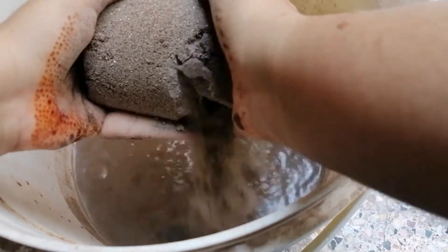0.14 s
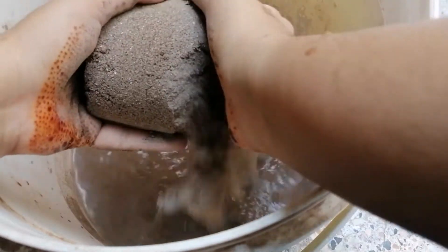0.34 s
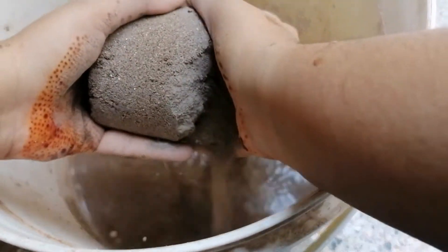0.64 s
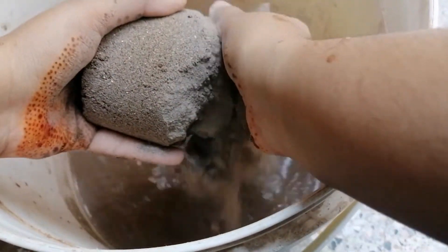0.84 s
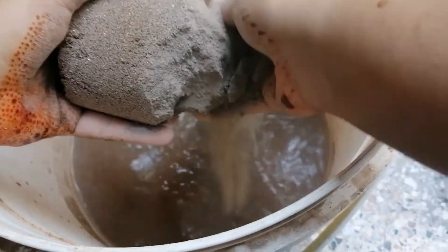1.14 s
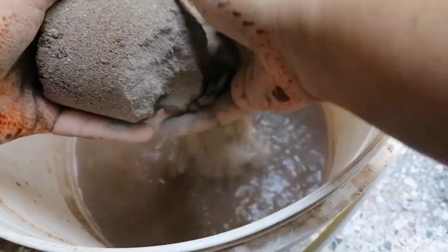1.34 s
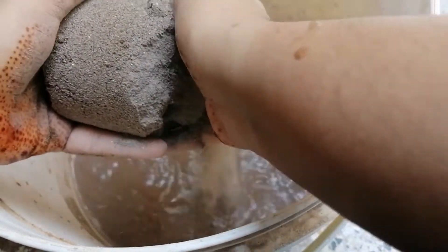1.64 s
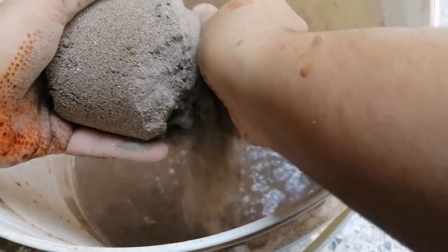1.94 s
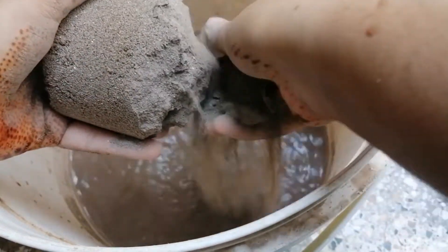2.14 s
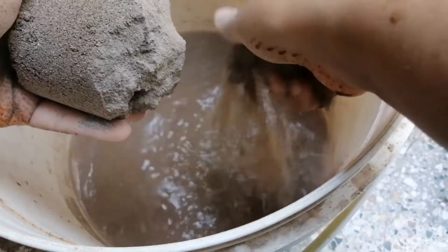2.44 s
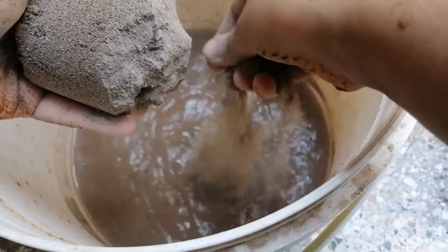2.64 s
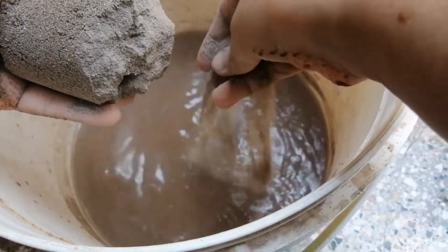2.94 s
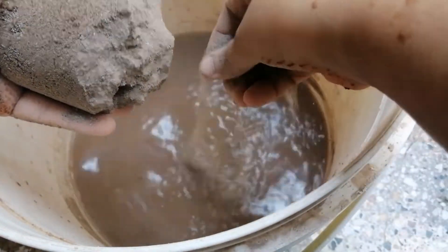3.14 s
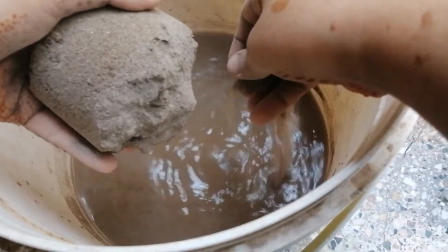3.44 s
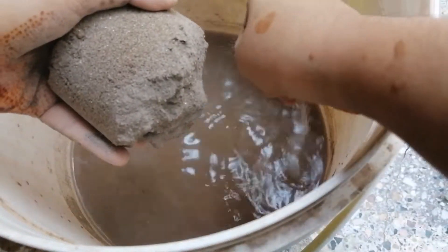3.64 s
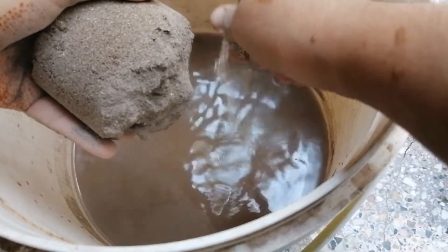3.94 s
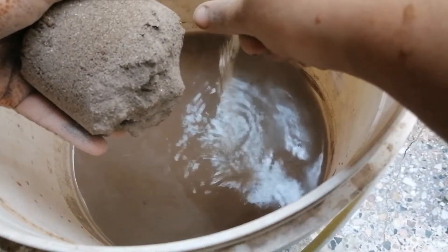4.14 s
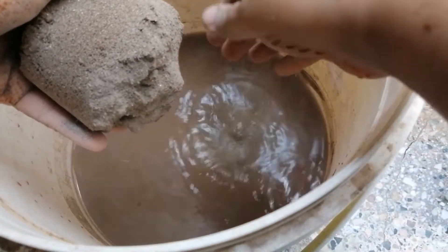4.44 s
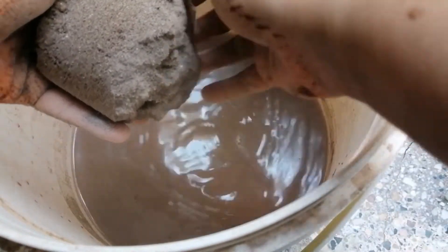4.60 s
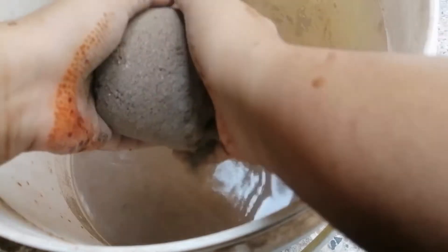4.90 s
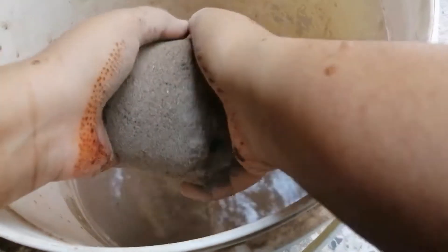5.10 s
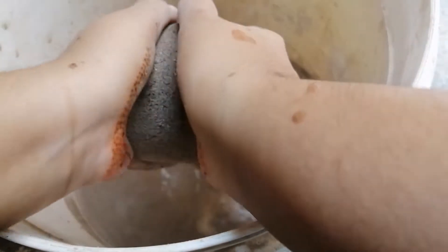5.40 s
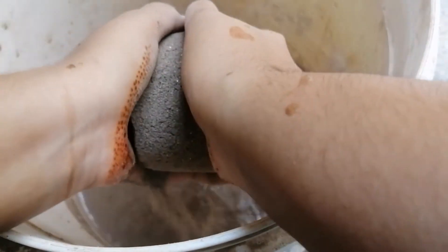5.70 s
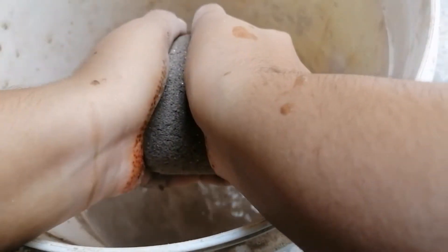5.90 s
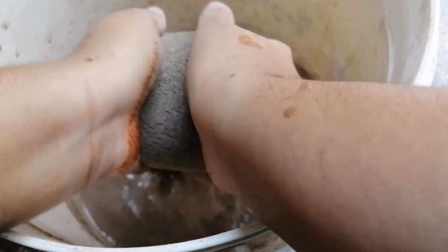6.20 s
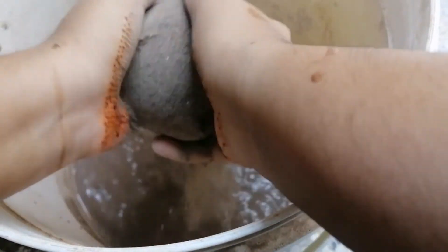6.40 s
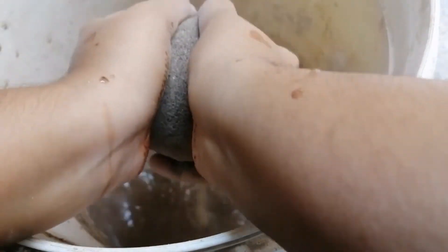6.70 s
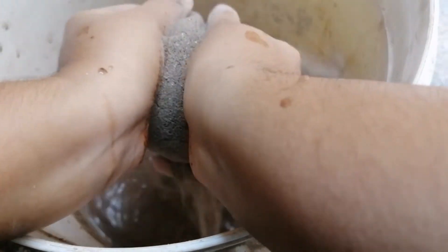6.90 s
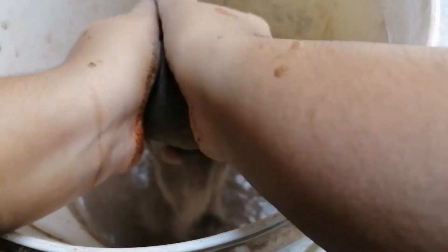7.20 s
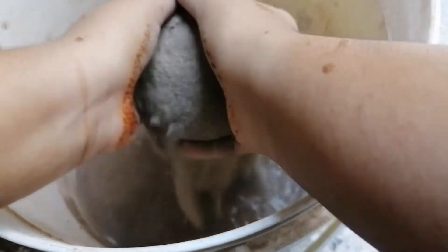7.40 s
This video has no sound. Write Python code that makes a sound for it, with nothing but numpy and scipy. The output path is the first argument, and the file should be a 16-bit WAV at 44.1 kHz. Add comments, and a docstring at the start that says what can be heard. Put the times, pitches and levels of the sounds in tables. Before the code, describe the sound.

Hands crumble wet sand over a plastic bucket of water, close by, with a faint, low machine hum throughout. From the start, grains rasp between the palms and patter onto the water. Crumbs make crisp, high ticks, and clods drop in with small plops and bubbles that ring briefly in the bucket, strongest around 0.3, 1 and 1.6 seconds. The ticks continue until about 2.7 seconds, then the sand thins to a faint trickle. At 3 seconds something is dragged in the distance, with a stronger low, booming scrape near 3.8 seconds. A few stray ticks and tiny bubbles follow between 4 and 4.5 seconds. Soft crumbling picks up at about 5 seconds. From 6 seconds comes a last flurry of gritty squeezes, ticks and plops, sharpest around 7 seconds and lasting to about 7.5 seconds.

```python
"""A machine hums while two hands crumble wet sand over a plastic bucket of water. From the start, grains
rasp between the palms and patter down. Crumbs tick, then clods plop in, leaving bubbles that ring in the
bucket. At 3 seconds the hands ease off and something is dragged in the distance. The crumbling picks up
again at about 5 seconds, with a last flurry of ticks and plops from 6 seconds on."""
import sys
import numpy as np
from scipy import signal
from scipy.fft import rfft, irfft, next_fast_len
from scipy.io import wavfile
from scipy.ndimage import uniform_filter1d, map_coordinates

SR = 44100
rng = np.random.default_rng(int(sys.argv[2]) if len(sys.argv) > 2 else 0)


def transcribe(signal):
    """Save signal, clipped to [-1, 1], as a 16-bit WAV file at the path in sys.argv[1]."""
    frames = np.atleast_2d(signal).T
    limited = np.clip(frames, -1, 1)
    pcm = np.round(limited * 32767).astype(np.int16)
    wavfile.write(sys.argv[1], SR, pcm)


N = 332955


def amp(db):
    return 10 ** (np.asarray(db) / 20)


def unit(x):
    return x / np.sqrt(np.mean(x ** 2) + 1e-20)


def along(points, hz):
    """Read a smooth line through (Hz, value) points."""
    pitches, values = np.transpose(points)
    return np.interp(np.log(hz + 1), np.log(pitches + 1), values)


def shaped(spectrum):
    return lambda hz: amp(along(spectrum, hz))


def resonances(table):
    """A filter that rings at each (Hz, width in Hz, dB) row."""
    return lambda f: sum((-1) ** k * amp(db) * 1j * f * width / (hz * hz - f * f + 1j * f * width)
                         for k, (hz, width, db) in enumerate(table))


def filtered(x, response):
    size = next_fast_len(N + SR // 2)
    return irfft(rfft(x, size) * response(np.fft.rfftfreq(size, 1 / SR)), size)[..., :N]


def wobble(rate):
    """A smooth curve through `rate` random values a second."""
    return map_coordinates(rng.standard_normal(int(N * rate / SR) + 4), [np.arange(N) * rate / SR])


def panned(x, pan_db):
    """Make stereo: pan is how much louder the left side is."""
    return np.array([x * amp(pan_db / 2), x * amp(-pan_db / 2)])


def add(track, start, sound):
    part = track[:, round(start * SR):][:, :sound.shape[1]]
    part += sound[:, :part.shape[1]]


def patchy(x, depth_db):
    """Make random patches of pitch and time louder or softer."""
    spectrum = signal.stft(x, nperseg=256)[2]
    patches = uniform_filter1d(rng.standard_normal(spectrum.shape[1:]), size=9, axis=0)
    patches = unit(uniform_filter1d(patches, size=14, axis=1))
    return unit(signal.istft(spectrum * amp(depth_db * patches), nperseg=256)[1][:, :N])


def swells(rows, edge_db):
    """A loudness curve of overlapping swells, each edge_db down at its ends."""
    t = np.arange(0, N, 64) / SR
    power = sum(amp(2 * (db - edge_db * np.maximum((peak - t) / rise, (t - peak) / fall)))
                for peak, rise, fall, db in rows)
    return np.interp(np.arange(N) / SR, t, np.sqrt(power))


def bursts(table, rise_share, edge_db):
    """One curve of swells for each of a table's two levels."""
    return [swells([(peak, rise_share * length, (1 - rise_share) * length, levels[k])
                    for peak, length, *levels in table], edge_db) for k in (0, 1)]


# Each row: pitch in Hz, how alike left and right are (1 is identical).
LIKENESS = [(60, 0.59), (240, 0.88), (950, 0.093), (3770, 0.0083), (15000, 0.016)]

def rush(response, grain_db=0., grain_rate=400):
    """Stereo noise, more alike in the bass; grains are quick flickers of level."""
    def colour(hz):
        angle = np.arccos(along(LIKENESS, hz)) / 2
        return response(hz) * [np.cos(angle), np.sin(angle)]
    noise = rng.standard_normal((2, N)) * amp(grain_db * wobble(grain_rate))
    mid, side = filtered(noise, colour)
    return unit(np.array([mid + side, mid - side]))


# The steady air. Each row: pitch in Hz, relative strength in dB.
AIR_SPECTRUM = [(13, -52), (22, -10.5), (42, -3), (65, -12.5), (125, -9), (175, -15), (313, -20.5),
                (576, -27), (921, -30), (1650, -36), (2600, -32.5), (4220, -47), (6570, -42), (15100, -54),
                (16400, -80)]

def machine_and_air(hum_hz=88.6, whine_hz=895):
    """A machine's wavering hum and thin whine over the air of the place."""
    phase = 2 * np.pi * np.cumsum(hum_hz + 0.92 * wobble(3)) / SR
    hum = np.sqrt(2) * amp(-55 + 1.2 * wobble(4)) * np.sin(phase)
    air = amp(-57) * panned(0.88, 1.0)[:, None] * rush(shaped(AIR_SPECTRUM))
    whine = amp(-72) * rush(resonances([(whine_hz, 28, 0)]))
    return panned(hum, 3.3) + air + whine


# The steady flow of grains. Each row: time in seconds, level in dB.
TRICKLE = [(0, -61), (0.4, -51), (0.67, -62.5), (1.0, -51), (1.3, -62.5), (1.6, -59), (2.5, -60),
           (2.8, -64), (4.35, -63.5), (4.65, -71.5), (5.3, -60.5), (5.95, -68), (6.3, -55.5), (7.0, -57.5),
           (7.55, -60)]
# Squeezes that shed sand. Each row: peak time and length in seconds, rasp and patter levels in dB.
SQUEEZES = [(0.197, 0.032, -43.5, -48), (0.296, 0.15, -41, -49), (0.54, 0.056, -40, -45),
            (0.751, 0.12, -54.5, -51), (1.09, 0.22, -47.5, -53), (1.535, 0.3, -45, -49.5),
            (1.821, 0.23, -50.5, -66), (2.06, 0.087, -50.5, -49), (2.36, 0.26, -56, -73.5),
            (2.55, 0.1, -61, -82), (2.675, 0.07, -51, -55.5), (3.401, 0.052, -58, -57.5),
            (4.473, 0.088, -54.5, -54), (5.0, 0.55, -56, -63), (5.44, 0.3, -57.5, -61),
            (5.54, 0.2, -52.5, -61), (5.72, 0.21, -55, -60.5), (6.063, 0.14, -53, -60),
            (6.165, 0.036, -61, -45), (6.215, 0.15, -49, -58), (6.42, 0.072, -47, -61.5),
            (6.528, 0.04, -45.5, -68), (6.678, 0.18, -51.5, -61), (6.973, 0.21, -45, -53),
            (7.1, 0.06, -44, -50), (7.55, 0.17, -58, -48)]
# Grains rubbing. Each row: pitch in Hz, relative strength in dB.
RASP_SPECTRUM = [(2060, -10), (3500, -5.5), (3980, -13.5), (4860, -3), (6220, 1), (7310, 4.5), (9220, -8),
                 (15600, -13.5), (16400, -40)]
# Grains hitting water. Each row: pitch in Hz, relative strength in dB.
PATTER_SPECTRUM = [(530, -56), (900, -10), (1010, -12), (1700, -27), (2740, -4.5), (3830, -12.5),
                   (5000, -9.5), (6500, -20), (11000, -120)]

def sand():
    """Grains rub between the palms, sprinkle the water and make it fizz."""
    trickle = amp(np.interp(np.arange(N) / SR, *np.transpose(TRICKLE)))
    shed, sprinkle = bursts(SQUEEZES, rise_share=0.5, edge_db=16.5)
    flow = np.hypot(trickle, shed)
    landing = np.hypot(amp(-9.5) * trickle, sprinkle)
    grit = patchy(rush(shaped(RASP_SPECTRUM), grain_db=2.5, grain_rate=570), depth_db=2.5)
    rasp = flow * amp(1.2 * wobble(40)) * panned(1, 1.9 + 1.3 * wobble(1.4)) * grit
    patter = landing * patchy(rush(shaped(PATTER_SPECTRUM), grain_db=3, grain_rate=230), depth_db=2.5)
    droplets = fizz(landing, low_hz=1248, spread=1.0, cycles=14, range_db=29, count=500)
    pings = fizz(landing, low_hz=4600, spread=0.8, cycles=28, range_db=26, count=900)
    pings = filtered(pings, shaped(RASP_SPECTRUM))
    return rasp + patter + amp(-13.5) * landing * droplets + amp(-13) * flow * pings


def fizz(flow, low_hz, spread, cycles, range_db, count):
    """Tiny bubbles ring briefly and rise in pitch, crowding where the flow is strong."""
    when, pitch, size, side = rng.random((count, 4)).T[:, :, None]
    samples = np.arange(SR // 100)
    turns = low_hz * np.exp(spread * pitch) * samples / SR
    shape = amp(-60 * turns / cycles) * (1 - np.exp(-turns / 2))
    pings = shape * np.sin(2 * np.pi * turns * (1 + 0.025 * turns / cycles))
    pair = panned(amp(range_db * size ** 3) * pings, 16 * (side - .4))
    share_fallen = np.cumsum(flow ** 2) / np.sum(flow ** 2)
    places = (np.interp(when, share_fallen, np.arange(N)).astype(int) + samples).ravel()
    return unit(np.array([np.bincount(places, channel.ravel(), N)[:N] for channel in pair]))


# Falling crumbs. Each row: time in seconds, level in dB, pitch in Hz, pan in dB.
CRUMBS = [(0.1258, -44, 5400, 13), (0.2042, -26.5, 7300, 6), (0.2403, -38, 7000, 8), (0.2712, -21, 7270, 4),
          (0.2976, -37, 7550, -3), (0.347, -26.5, 7140, 6), (0.4923, -32, 7300, 2.0),
          (0.5227, -29, 7300, 3.5), (0.5274, -31, 5610, 3), (0.5484, -39, 7000, -1),
          (0.616, -38.5, 6100, 7), (0.7513, -30.5, 7400, -1), (0.9283, -34, 7140, 5),
          (1.0234, -27, 7100, 3), (1.0384, -34, 7000, 3.5), (1.1004, -29, 6600, 0.5),
          (1.1037, -27.5, 7000, 4.0), (1.1503, -45, 7340, 4.5), (1.1677, -40, 5000, 10),
          (1.3893, -34.5, 8700, -11), (1.492, -39, 6860, 5.5), (1.515, -40, 7150, 8.5),
          (1.546, -40, 6100, 5.0), (1.573, -37, 7210, 3.0), (1.6038, -30, 4690, 2),
          (1.6163, -24.5, 7200, 1.5), (1.7868, -36.5, 4650, 8), (2.0368, -33.5, 4660, 3),
          (2.0497, -34, 7200, 8), (2.305, -36, 5200, -3), (2.3181, -35, 7220, -2), (2.3374, -35, 8300, -8),
          (2.367, -22.5, 8060, -2), (2.402, -35, 6860, 3), (2.5429, -36.5, 7160, 1.5),
          (2.566, -34.5, 6950, 1), (2.6643, -34.5, 6900, -6), (2.6923, -29.5, 7240, -4),
          (4.0128, -41, 5350, -2), (4.1455, -38.5, 7300, 1), (4.4769, -34, 6700, 2),
          (5.0816, -33, 7840, -3), (5.3632, -46, 7560, -10), (5.6366, -43, 7100, 10),
          (5.8935, -41, 6800, 2.5), (6.149, -28.5, 5530, 0), (6.171, -29.5, 6600, -3),
          (6.21, -32, 6890, -3), (6.3767, -30, 7800, -1), (6.4205, -31.5, 5260, 8), (6.5012, -35, 7200, 10),
          (6.6755, -38, 5740, 6), (6.6868, -31, 6580, 9), (6.961, -19, 6600, 4), (6.9724, -27, 6900, 8.0),
          (6.9944, -30, 5200, 5.5), (7.0414, -36.5, 6840, 14), (7.0718, -32.5, 6960, 4.5),
          (7.0876, -17.5, 7420, 0.5), (7.1704, -31, 6600, 2.5)]

def crumb_ticks(rise_s=.006, fade_s=.010, spatter_s=.05):
    """Each crumb makes a tiny blip inside a puff of grit, then faint spatter."""
    blips, puffs = np.zeros((2, 2, N))
    t = np.arange(SR // 20) / SR - .003
    shape = np.where(t < 0, amp(60 * t / rise_s), amp(-60 * t / fade_s))
    spatter = 0.38 * (t > 0) * amp(-60 * t / spatter_s)
    for start, db, hz, pan_db in CRUMBS:
        noise = rng.standard_normal((3, len(t)))
        gain = amp(db) * panned(0.79, pan_db)[:, None]
        phase = 2 * np.pi * hz * t + np.cumsum(0.13 * noise[2]) + rng.normal(0, 1, (2, 1))
        add(blips, start - .002, 0.88 * gain * shape * np.sin(phase))
        add(puffs, start - .002, 0.73 * gain * (shape + spatter) * noise[:2])
    return blips + filtered(puffs, shaped(RASP_SPECTRUM))


def wall_echo(x, fade_s=.08):
    """The bucket wall answers with a short, blurred echo."""
    t = np.arange(SR // 4) / SR
    tail = rng.standard_normal((2, len(t))) * amp(-60 * t / fade_s)
    delayed = np.pad(x, ((0, 0), (60, 0)))
    return signal.fftconvolve(delayed, tail / np.linalg.norm(tail[0]), axes=1)[:, :N]


# Bubbles. Each row: start in seconds, level in dB, pitch in Hz, seconds to fade by 60 dB, pan in dB.
BUBBLES = [(0.217, -41, 2780, 0.024, 7), (0.241, -30.5, 1070, 0.0054, -2), (0.3, -30, 1310, 0.014, -9),
           (0.3075, -19, 317, 0.078, 2.5), (0.314, -40, 1260, 0.041, 14), (0.33, -39, 757, 0.068, 11),
           (0.437, -28, 1630, 0.027, 6), (0.435, -27, 1020, 0.026, -1), (0.436, -25.5, 290, 0.021, -3),
           (0.526, -29.5, 3210, 0.013, -1), (0.528, -26.5, 983, 0.026, 8), (0.531, -42.5, 294, 0.12, 7),
           (0.62, -27.5, 1064, 0.024, -1), (0.723, -31, 3000, 0.018, 5), (0.744, -35.5, 3044, 0.024, 14),
           (0.813, -38, 2980, 0.016, 7), (0.967, -44, 2650, 0.031, 10), (1.009, -30, 1120, 0.037, -5),
           (1.025, -25.5, 2340, 0.026, -1), (1.033, -41, 1462, 0.094, 10), (1.048, -35.5, 849, 0.15, 6.5),
           (1.076, -39.5, 3600, .02, 11), (1.104, -42, 1490, 0.069, 11), (1.152, -37, 660, 0.066, 1),
           (1.17, -34.5, 857, 0.042, 12), (1.317, -39.5, 1220, 0.021, 11), (1.382, -42.5, 3000, 0.021, 3),
           (1.41, -42, 2730, 0.031, 4), (1.433, -42, 2260, 0.038, -3), (1.499, -33.5, 2010, 0.012, 4),
           (1.535, -29.5, 2680, 0.011, 1), (1.534, -39, 800, 0.016, 2), (1.549, -20.5, 822, 0.06, 2.5),
           (1.575, -32.5, 2250, 0.012, 0), (1.572, -38, 787, 0.031, 27), (1.604, -21, 1033, 0.033, 1),
           (1.618, -29.5, 792, 0.054, 10), (1.981, -43.5, 2570, 0.06, 0), (2.042, -32, 1605, 0.018, 12),
           (2.055, -30, 1220, 0.02, -10), (2.124, -43, 3000, .022, 7), (2.122, -38, 1032, 0.093, 8),
           (2.165, -39.5, 2240, 0.062, 5), (2.229, -46, 2450, 0.029, 3), (2.297, -43.5, 2550, 0.021, 5),
           (2.329, -40, 2370, 0.023, 1), (2.359, -35.5, 2040, 0.013, -5), (2.645, -49, 1920, 0.042, -1),
           (2.69, -39.5, 1007, 0.024, -2), (2.69, -39, 2160, 0.026, -6), (3.099, -47.5, 2420, 0.057, -8),
           (4.451, -40, 3100, 0.024, 4), (4.479, -42, 2190, 0.024, 1), (5.638, -39, 3470, 0.024, -10),
           (5.664, -38, 2920, 0.022, -9), (5.888, -36, 2880, 0.023, 7), (5.896, -38.5, 2350, 0.031, -1),
           (6.174, -37.5, 1150, 0.021, -20), (6.214, -43, 2240, 0.03, -3), (6.239, -29.5, 680, 0.028, -6),
           (6.349, -43, 3220, 0.018, 8), (6.354, -44, 1650, 0.04, -7), (6.379, -29.5, 711, 0.048, 6),
           (6.379, -30, 1096, 0.031, 1), (6.417, -39.5, 4400, 0.018, -2), (6.467, -40.5, 2790, 0.034, -4),
           (6.54, -26, 1040, 0.014, 3), (6.549, -36, 2450, 0.011, 7), (6.595, -38, 2130, 0.028, -1),
           (6.633, -37, 2780, 0.015, 5), (6.649, -26.5, 3230, 0.012, 0), (6.679, -37, 2980, 0.018, 11),
           (6.908, -41.5, 1394, 0.058, 11.5), (6.962, -31.5, 2960, 0.023, 14.5),
           (6.963, -34, 2527, 0.051, 0), (6.99, -38.5, 1157, 0.066, -2), (7.081, -36.5, 805, 0.072, 3),
           (7.088, -25.5, 853, 0.031, 0), (7.086, -35, 390, 0.048, 1), (7.088, -21.5, 3620, 0.0088, -2),
           (7.241, -32.5, 2980, 0.017, 1), (7.474, -32, 2240, 0.014, -7), (7.529, -46.5, 1410, 0.087, 10)]
# The notes of the air in the bucket. Each row: pitch in Hz, width in Hz, strength in dB.
BUCKET_NOTES = [(263, 17, -13.5), (525, 60, -15), (782, 89, -8.5), (1092, 47, -7.5), (1540, 230, -23)]

def bubble_plops():
    """Each bubble rings and creeps up in pitch; the blow that makes it also stirs the bucket's air."""
    tones, blows = np.zeros((2, 2, N))
    t = np.arange(SR // 8) / SR
    for start, db, hz, fade_s, pan_db in BUBBLES:
        # The tone quivers because the bubble is not quite round.
        quiver = np.cumsum(rng.normal(0, 0.073 * min(hz / 900, np.sqrt(hz / 900)), len(t)))
        phase = 2 * np.pi * hz * (t + rng.uniform(0.0033, 0.11) * t ** 2 / fade_s) + quiver
        side_lag = rng.normal(0, 0.48) * np.array([[1], [-1]]) * hz / 1500
        shape = amp(db - 60 * t / fade_s) * (1 - np.exp(-t * hz))
        add(tones, start - .002, panned(1, pan_db)[:, None] * shape * np.sin(phase + side_lag))
        # Heavy clods, with low bubbles, strike hard; the deepest sink in softly.
        force = min(hz / 600, 1, (900 / hz) ** 4.1)
        splat = rng.standard_normal((3, len(t)))
        add(blows, start - .002, amp(db - 60 * t / 0.027) * force * (splat[0] + 0.36 * splat[1:]))
    ring = filtered(7.6 * blows + .5 * tones, resonances(BUCKET_NOTES))
    thud = filtered(blows, lambda hz: 1 / (1 + 1j * hz / 1300) ** 2)
    return tones + ring + 0.48 * thud


def slosh(clod_hz=1280, lag_s=0.0066, rise_s=0.038, fall_s=0.06):
    """Churning water keeps the bucket's air sounding; bigger clods churn longer."""
    churns = [(start + lag_s, rise_s, fall_s * (clod_hz / hz) ** 1.3, db - 23)
              for start, db, hz, *_ in BUBBLES if hz < clod_hz]  # clods leave the low bubbles
    return swells(churns, edge_db=29) * rush(resonances(BUCKET_NOTES), grain_db=2.5, grain_rate=90)


# Shoves. Each row: peak time and length in seconds, boom and scrape levels in dB.
SHOVES = [(3.002, 0.22, -58.5, -60.5), (3.407, 0.072, -72, -57.5), (3.633, 0.15, -68, -50),
          (3.7, 0.13, -45, -51.5), (3.78, 0.24, -41.5, -50)]
# The dragged object's notes. Each row: pitch in Hz, width in Hz, relative strength in dB.
BOOM_NOTES = [(184, 33, -23), (226.4, 19, 30), (313, 46, -16)]
# Its scrape. Each row: pitch in Hz, relative strength in dB.
SCRAPE_SPECTRUM = [(190, -59), (330, 0.5), (372, -8), (453, -4), (679, -3), (969, -19), (2870, -21),
                   (3500, -26), (4550, -61), (7700, -120)]

def distant_drag():
    """A far object slides in shoves, with a lumpy boom and a rough scrape."""
    boom, scrape = bursts(SHOVES, rise_share=0.55, edge_db=15)
    return (boom * rush(resonances(BOOM_NOTES), grain_db=0.52, grain_rate=41)
            + scrape * rush(shaped(SCRAPE_SPECTRUM), grain_db=2.5, grain_rate=80))


def scene():
    plops, ticks = bubble_plops(), crumb_ticks()
    echo = wall_echo(amp(-5) * plops + amp(-9) * ticks)
    return plops + ticks + echo + slosh() + sand() + distant_drag() + machine_and_air()


PORT_HZ, PORT_WIDTH_HZ, PORT_DB, TOP_HZ = 6790, 76, -2.5, 16100

def record(dry):
    """The microphone's opening lifts a narrow treble band; the very top is cut off."""
    port = resonances([(PORT_HZ, PORT_WIDTH_HZ, PORT_DB)])
    return filtered(dry, lambda hz: (1 + port(hz)) * (hz < TOP_HZ))


dry = scene()
out = record(dry)
transcribe(out)
```